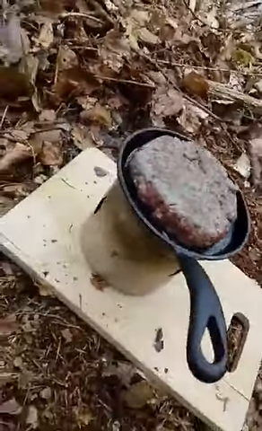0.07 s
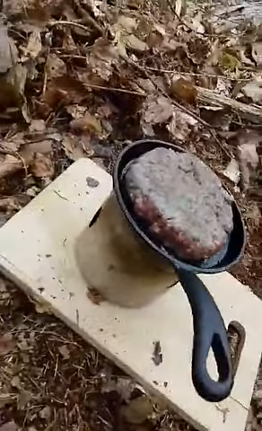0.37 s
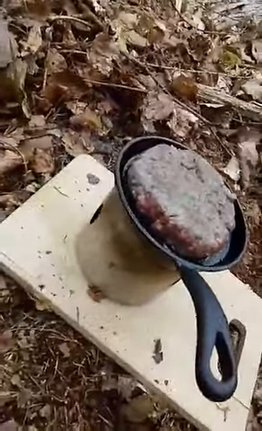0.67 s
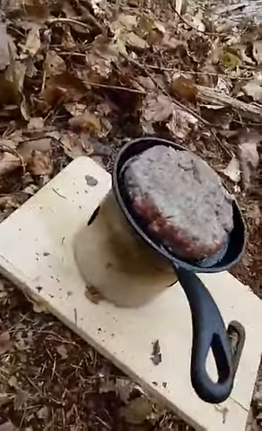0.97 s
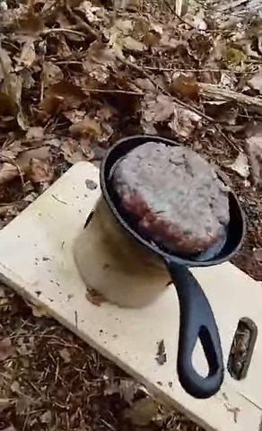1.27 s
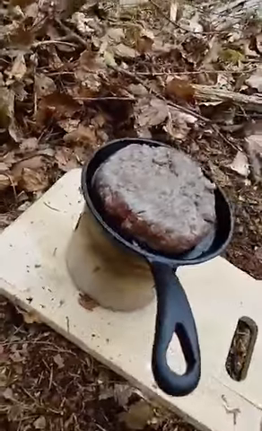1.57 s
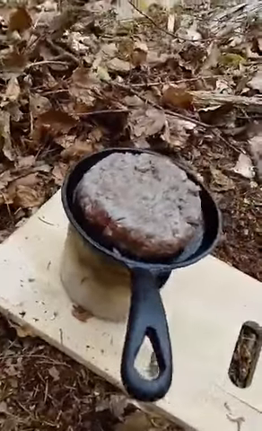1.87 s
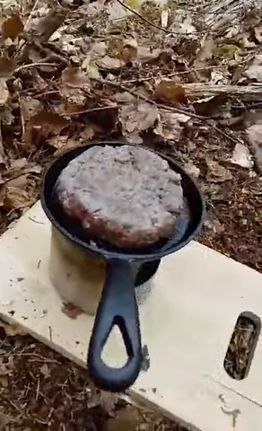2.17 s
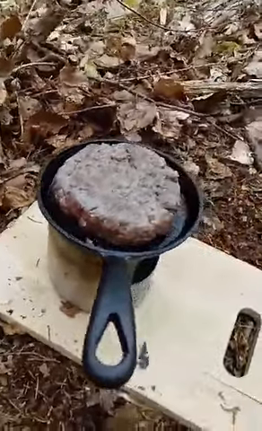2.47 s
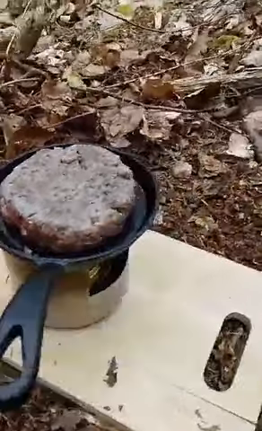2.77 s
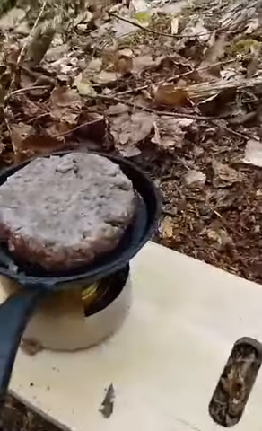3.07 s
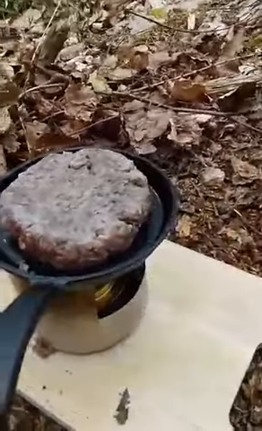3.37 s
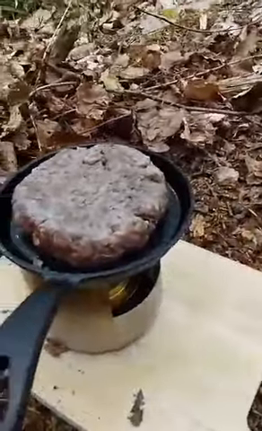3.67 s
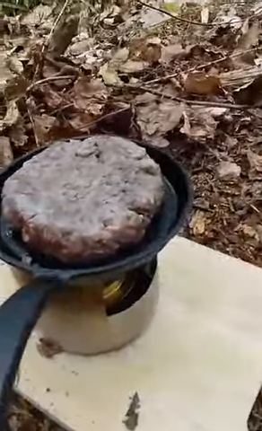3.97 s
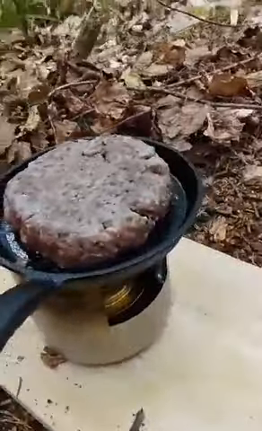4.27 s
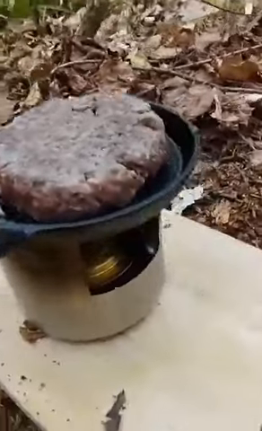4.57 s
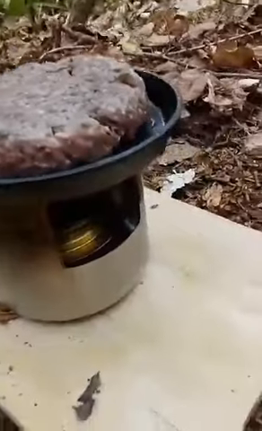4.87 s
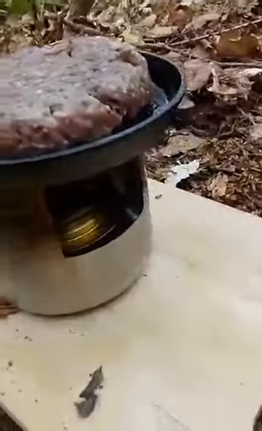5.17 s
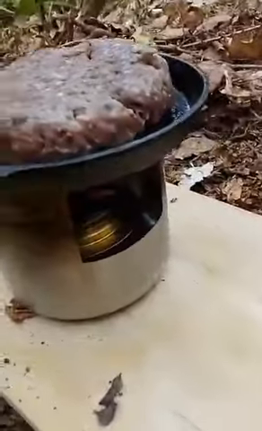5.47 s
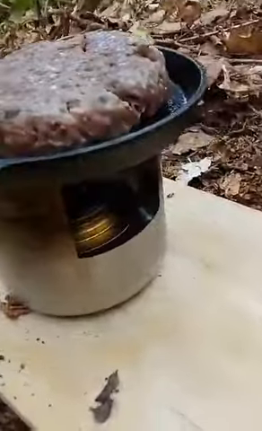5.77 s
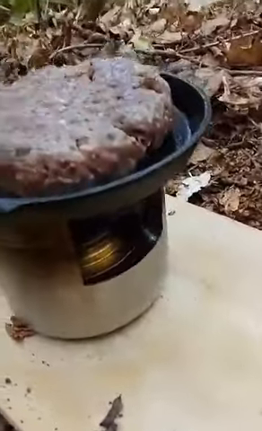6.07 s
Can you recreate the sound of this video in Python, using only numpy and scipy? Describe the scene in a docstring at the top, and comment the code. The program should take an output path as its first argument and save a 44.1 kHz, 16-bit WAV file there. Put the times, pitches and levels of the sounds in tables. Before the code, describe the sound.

Steady fizzing and sharp crackles of meat frying in fat, with a soft stove burner rumble and a few dull pops underneath.

```python
"""A burger fries in a small iron pan on a camping stove, outdoors on the forest floor.
We open above the pan: tiny steam bubbles fizz in the fat, larger ones tick and spit, the burner rumbles.
As the microphone circles to the side, soft low thumps sound; the level dips briefly after the loudest spit.
A flurry of spits follows, and steam plops from under the meat. Last, the microphone sinks to rim height,
where the sizzle is duller and the flame nearer, and the boil eases."""
import sys
import numpy as np
from scipy import signal
from scipy.fft import rfft, irfft
from scipy.io import wavfile
from scipy.ndimage import uniform_filter1d

SR = 44100
rng = np.random.default_rng(int(sys.argv[2]) if len(sys.argv) > 2 else 0)


def dump(signal):
    """Clip the signal to [-1, 1] and save it as 16-bit WAV at the path in sys.argv[1]."""
    limited = np.clip(np.atleast_2d(signal).T, -1, 1)
    pcm = np.round(limited * 32767).astype(np.int16)
    wavfile.write(sys.argv[1], SR, pcm)


N = 278271
TIME = np.arange(N) / SR


def from_db(db):
    """Decibels to gain."""
    return 10 ** (np.asarray(db) / 20)


def rms_one(x):
    """Scale to rms 1."""
    return x / np.sqrt(np.mean(x ** 2) + 1e-20)


def energy_one(x):
    """Scale a short sound to energy 1."""
    return x / np.linalg.norm(x)


def drift(per_s):
    """Random modulator of rms 1, gliding to a new value per_s times a second."""
    knots = rng.standard_normal(4096)
    return rms_one(np.interp(TIME * per_s, np.arange(len(knots)), knots))


def response(spectrum, size=4096):
    """Minimum-phase impulse response of energy 1 for an EQ curve."""
    hz, level_db = np.transpose(spectrum)
    grid_hz = np.maximum(np.arange(size // 2 + 1) * SR / size, 1)
    gains = rms_one(from_db(np.interp(np.log(grid_hz), np.log(hz), level_db)))
    cepstrum = irfft(np.log(gains))
    cepstrum[1:size // 2] *= 2
    cepstrum[size // 2 + 1:] = 0
    return irfft(np.exp(rfft(cepstrum)))


def coloured(x, spectrum):
    """Apply an EQ curve; white noise keeps its level."""
    return signal.fftconvolve(x, response(spectrum))[:N]


def resonance(x, hz, width_hz):
    """Two-pole band-pass with gain 1 at its peak."""
    r = np.exp(-np.pi * width_hz / SR)
    feedback = [1, -2 * r * np.cos(2 * np.pi * hz / SR), r * r]
    return signal.lfilter(np.array([1, 0, -1]) * (1 - r * r) / 2, feedback, x + 1e-18)


def add(track, s, sound):
    """Mix a short sound in at time s."""
    start = max(round(s * SR), 0)
    part = track[start:start + len(sound)]
    part += sound[:len(part)]


def damped_tones(rows, decay_cycles, rise_cycles, gain_db, size=8192):
    """One sine hit per cue, swelling and dying within a few cycles."""
    out = np.zeros(N)
    for s, peak_db, hz in rows:
        turns = hz * np.arange(size) / SR
        envelope = np.exp(-turns / decay_cycles) * (1 - np.exp(-turns / rise_cycles))
        tone = np.sin(2 * np.pi * turns) * envelope
        add(out, s, from_db(peak_db + gain_db) * tone / np.abs(tone).max())
    return out


def viewpoints(circle_s=(1.8, 3.6), sink_s=(4.08, 4.66)):
    """The microphone move as three crossfades: above the pan, beside it, at rim height."""
    circled = np.interp(TIME, circle_s, [0, 1])
    sunk = np.interp(TIME, sink_s, [0, 1])
    return 1 - circled, circled * (1 - sunk), circled * sunk


# Flame EQ: its rumble, its rush from afar and near the windscreen's opening (f/Hz, relative level/dB)
RUMBLE_EQ = [(22, -40), (40, -24), (55, -9), (66, 1.5), (76, -1), (92, -5.5), (120, -2.5), (135, -1.5),
             (170, -12), (240, -16.5), (320, -25), (600, -43.5)]
RUSH_FAR_EQ = [(120, -5), (300, -1), (480, -2), (800, 0), (1000, -2), (1160, -6), (1400, 3), (1560, 0.5),
               (1950, -14), (3000, -4.5), (8000, -47)]
RUSH_NEAR_EQ = [(120, -8), (300, 0), (580, 1.5), (800, 2.5), (1000, 2), (1160, -3), (1450, -1), (1620, -5),
                (1750, 1), (1970, -18.5), (2300, -10.5), (8000, -32)]


def burner():
    """The bed: an evenly fed flame rumbles, flutters and faintly rings the windscreen; louder up close."""
    near = viewpoints()[-1]
    rumble = coloured(rng.standard_normal(N), RUMBLE_EQ)
    rumble /= np.sqrt(uniform_filter1d(rumble ** 2, SR // 4) + 1e-12)  # level out the slow swells
    eddies = rng.standard_normal(N) * from_db(1.82 * drift(per_s=150))
    rush = (1 - near) * coloured(eddies, RUSH_FAR_EQ) + near * coloured(eddies, RUSH_NEAR_EQ)
    windscreen = from_db(-13.5) * rms_one(resonance(rng.standard_normal(N), hz=948, width_hz=38))
    return from_db(-53 + 1.5 * near) * rumble + from_db(-59 + 1.6 * near) * (rush + windscreen)


# Low thump cues (t/s, relative peak level/dB, f/Hz)
THUMP_CUES = [(2.169, -44, 80), (2.269, -51, 109), (2.794, -46, 154), (4.133, -38.5, 130),
              (4.139, -42, 198)]


def thumps():
    """Soft low thumps with a rounded attack."""
    return damped_tones(THUMP_CUES, decay_cycles=0.63, rise_cycles=0.44, gain_db=2.5)


# Steam pop cues (t/s, relative peak level/dB, f/Hz)
PLOP_CUES = [(0.986, -38, 1260), (3.779, -35.5, 1340), (3.823, -35, 1480), (4.096, -35, 1320),
             (4.353, -38.5, 1420), (5.357, -40, 970), (5.665, -40, 918), (6.195, -41, 715)]


def plops():
    """Steam escapes from under the meat in dull pops."""
    return damped_tones(PLOP_CUES, decay_cycles=1.2, rise_cycles=0.12, gain_db=-1.5)


# Pan EQ from above, from the side and at rim height (f/Hz, relative level/dB)
PAN_ABOVE_EQ = [(300, -19), (1450, -17), (2000, -18.5), (2600, -9), (3950, 0), (4480, -7), (5500, 1),
                (6300, 0.5), (7000, -8), (8000, -4), (10000, -11.5), (11700, -9), (12500, -12.5),
                (13800, -10.5)]
PAN_BESIDE_EQ = [(300, -17.5), (1400, -14), (2100, -20.5), (3100, -5.5), (3700, -3), (4900, -9.5),
                 (6250, 1), (7200, -7), (8200, -7.5), (9500, -9.5), (10500, -15), (11800, -12.5),
                 (12800, -16), (13800, -10)]
PAN_RIM_EQ = [(300, -17), (1700, -9), (2000, -10), (2600, -8), (3400, -4), (4050, 1), (4700, -5), (6200, 1),
              (7000, -5), (7900, -4.5), (9300, -11), (11500, -12.5), (12500, -15), (13800, -11)]


def pan_responses():
    """Echoes between meat, iron and rim colour each burst: one impulse response per viewpoint."""
    return np.array([response(eq) for eq in (PAN_ABOVE_EQ, PAN_BESIDE_EQ, PAN_RIM_EQ)])


def burst(hz, droplets, spray_db, spray_s, ring_width_hz, ring_db):
    """A film snaps and its cavity rings for a few cycles; a spray of droplets follows."""
    t = np.arange(len(droplets)) / SR
    spray = energy_one(droplets * np.sqrt(t) * np.exp(-t / spray_s))
    push = (t == 0) + from_db(spray_db) * spray
    return energy_one(push + from_db(ring_db) * resonance(push, hz, ring_width_hz))


def fizz(per_s=8000, spread_db=1.5, flurry_db=1.24):
    """Thousands of tiny bubbles a second, bursting in little flurries."""
    bursting = rng.random(N) < per_s / SR
    size_db = spread_db * np.minimum(rng.exponential(1, N), 3)
    strength = from_db(size_db + flurry_db * drift(per_s=220))
    return rms_one(bursting * strength * rng.choice([-1, 1], N))


def ticks(count=1300, range_hz=(2760, 13530), spread_db=14.5, treble_db=4.5, size=256):
    """Middling bubbles burst at random moments, each with its own size and pitch."""
    out = np.zeros(N)
    for (when, pitch, bulk), droplets in zip(rng.random((count, 3)), rng.standard_normal((count, size))):
        hz = np.interp(pitch, [0, 1], range_hz)
        tick = burst(hz, droplets, spray_db=-2.0, spray_s=0.0011, ring_width_hz=1760, ring_db=12.5)
        add(out, when * N / SR, from_db(spread_db * bulk ** 3 + treble_db * pitch) * tick)
    return rms_one(out)


# Fader ride for the strength of the boil (t/s, relative level/dB)
BOIL_RIDE = [(0.0, -47), (0.37, -47), (0.88, -46), (1.49, -46), (2.14, -45.5), (2.96, -47.5), (3.35, -45.5),
             (3.83, -46), (4.25, -46.5), (4.83, -50.5), (6.0, -49), (6.3, -48)]


def sizzle(surge_db=0.75):
    """Fizz and ticks surge at random around the strength of the boil, coloured by the pan."""
    boil_db = np.interp(TIME, *np.transpose(BOIL_RIDE))
    bubbles = from_db(-2) * fizz() + from_db(-6) * ticks()
    bubbles *= from_db(boil_db + surge_db * drift(per_s=10))
    views = zip(viewpoints(), pan_responses())
    return sum(share * signal.fftconvolve(bubbles, pan)[:N] for share, pan in views)


def spatter(count=44, over_boil_db=25, spread_db=3, range_hz=(6500, 10500), spray_db=(-16, -2.5)):
    """Random cues for lesser spits, which follow the strength of the boil."""
    when, bulk, pitch, spray = rng.random((count, 4)).T
    s = when * TIME[-1]
    snap_db = np.interp(s, *np.transpose(BOIL_RIDE)) + over_boil_db + spread_db * (2 * bulk - 1)
    return np.transpose([s, snap_db, np.interp(pitch, [0, 1], range_hz), np.interp(spray, [0, 1], spray_db)])


def rim_echo(x, delay_s=0.00048, echo_db=-20):
    """A snap arrives twice: straight, and a moment later off the rim."""
    at = np.arange(len(x))
    return x + from_db(echo_db) * np.interp(at - delay_s * SR, at, x, left=0)


# Foreground spit cues (t/s, relative snap level/dB, f/Hz, spray level against the snap/dB)
SPIT_CUES = [(0.1097, -13.5, 10600, -11), (0.7437, -13, 5800, -19), (0.8087, -21.5, 6900, -6),
             (0.8356, -18, 10000, -11), (1.0597, -18.5, 8600, -2), (1.226, -21, 6900, -10),
             (1.3177, -15, 6900, -5), (1.353, -15.5, 9800, -9), (1.456, -17.5, 4200, -15),
             (1.6457, -9.5, 7450, -15), (1.8866, -20, 9700, -11), (2.3654, -19.5, 8200, -12),
             (3.2246, -15.5, 8200, 2.5), (3.321, -12.5, 7050, -8), (3.3508, -13, 7700, -12),
             (3.5799, -8.5, 5900, -16), (3.6338, -16.5, 5800, -3), (3.6447, -14, 8100, -9),
             (3.6516, -10.5, 3700, -8), (3.6598, -14.5, 8500, -5), (3.7802, -14.5, 5500, -2),
             (3.8246, -15, 3850, -10), (3.8656, -17.5, 9000, -3), (3.9146, -16.5, 5900, -11),
             (3.9981, -15.5, 6000, 0), (4.0451, -13, 8450, -10), (4.0984, -12.5, 8700, -14),
             (4.1468, -18.5, 6650, -12), (4.1857, -17, 7660, -11), (4.228, -14.5, 3580, -10),
             (4.257, -19, 8700, 1), (4.2934, -18.5, 9700, -8), (4.3394, -19.5, 8100, 3.5),
             (4.4611, -19, 8100, -4), (4.495, -19, 9300, -12), (4.862, -19, 8300, -12),
             (5.0778, -20.5, 7140, 0), (5.1484, -18, 8100, -15), (5.1972, -18.5, 7900, -3),
             (5.3294, -15.5, 5070, -4), (6.0224, -19.5, 7200, -12), (6.1464, -13.5, 7600, -9),
             (6.2151, -18.5, 4700, -14), (6.2462, -21, 5500, -4)]


def spits(gain_db=-1.06, size=512):
    """Drops of water burst in the fat: one sharp snap each, coloured by the pan from that viewpoint."""
    cues = [*SPIT_CUES, *spatter()]
    out = np.zeros(N)
    shares = np.transpose(viewpoints())
    pan = pan_responses()[:, :size]
    for (s, snap_db, hz, spray_db), droplets in zip(cues, rng.standard_normal((len(cues), size))):
        snap = burst(hz, droplets, spray_db, spray_s=0.0017, ring_width_hz=3200, ring_db=4.5)
        snap += from_db(-1.5) * resonance(snap, hz=12000, width_hz=1600)  # bright edge of a violent tear
        snap += from_db(-14.5) * resonance(snap, hz=3320, width_hz=1100)  # gap between meat and rim
        heard = energy_one(np.convolve(rim_echo(snap), shares[round(s * SR)] @ pan))
        spray_gain = np.hypot(1, from_db(spray_db))  # the spray adds its energy to the snap's
        add(out, s, from_db(snap_db + gain_db) * spray_gain * heard)
    return out


def dip(start_s=3.581, fall_s=0.0064, hold_s=0.023, recovery_s=0.025, depth_db=-5.5):
    """Gain ride: the whole mix dips briefly, cued just after the loudest spit."""
    corners_s = start_s + np.cumsum([0, fall_s, hold_s, recovery_s])
    return from_db(depth_db * np.interp(TIME, corners_s, [0, 1, 1, 0]))


def scene(master_db=1.09):
    """Mono mix of pan and stove in open air, with no room around them."""
    mix = sizzle() + spits() + plops() + thumps() + burner()
    return (from_db(master_db) * dip() * mix)[None]


def record(dry, cutoff_hz=13950):
    """A steep low-pass takes off the very top."""
    low_pass = signal.firwin(201, cutoff_hz, window=("kaiser", 6), fs=SR)
    return signal.fftconvolve(dry, low_pass[None], mode="same")


dry = scene()
out = record(dry)
dump(out)
```